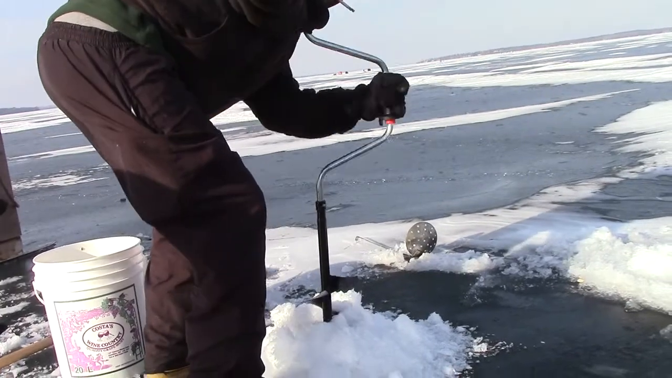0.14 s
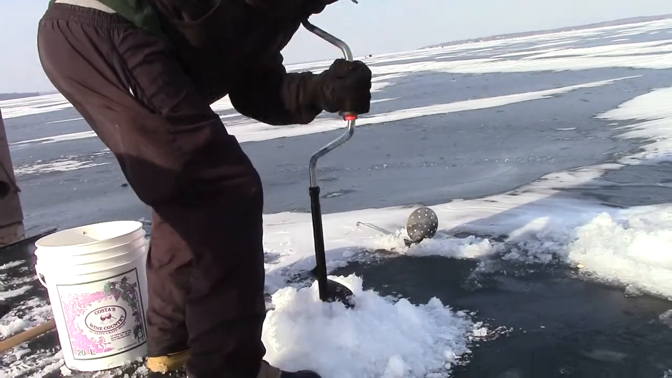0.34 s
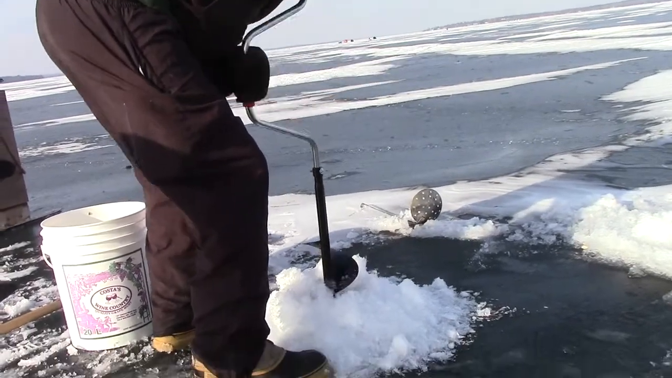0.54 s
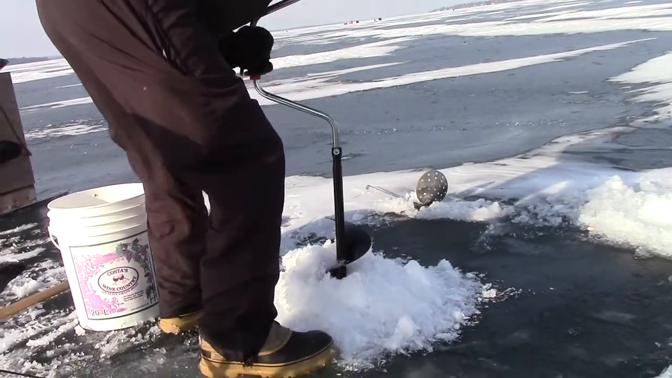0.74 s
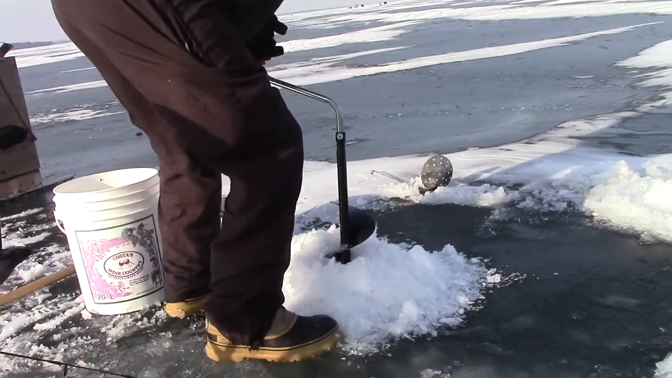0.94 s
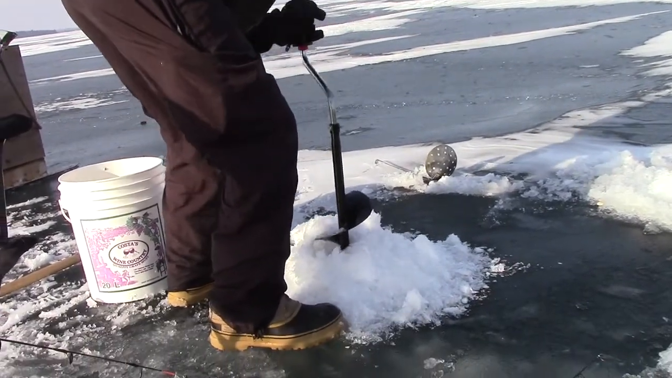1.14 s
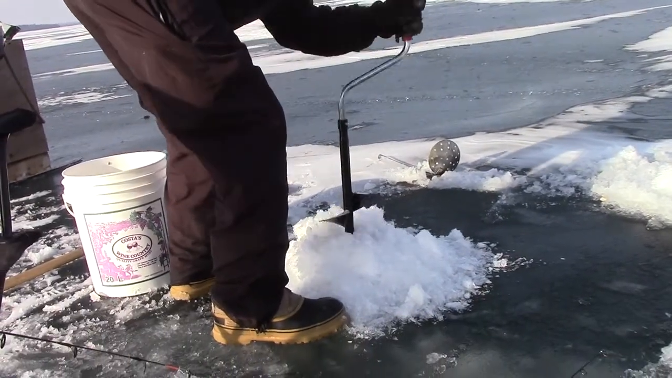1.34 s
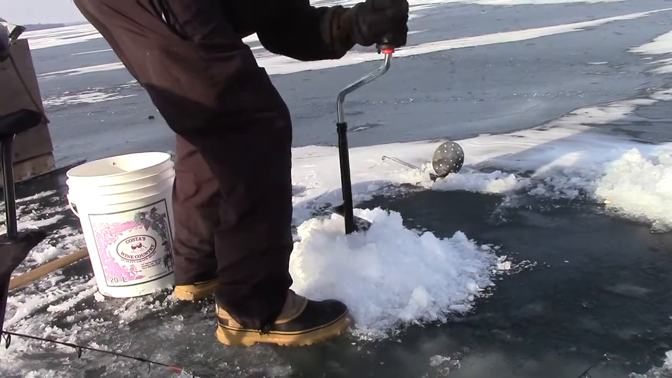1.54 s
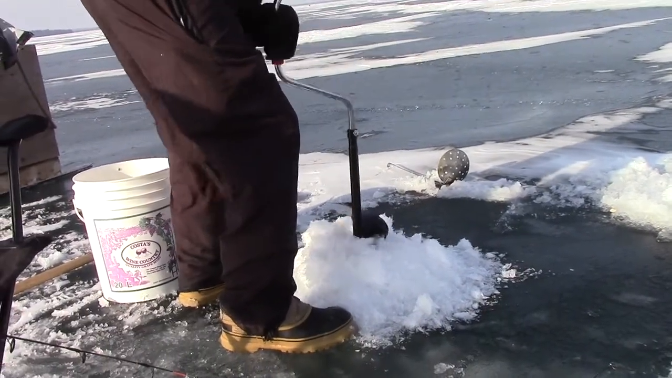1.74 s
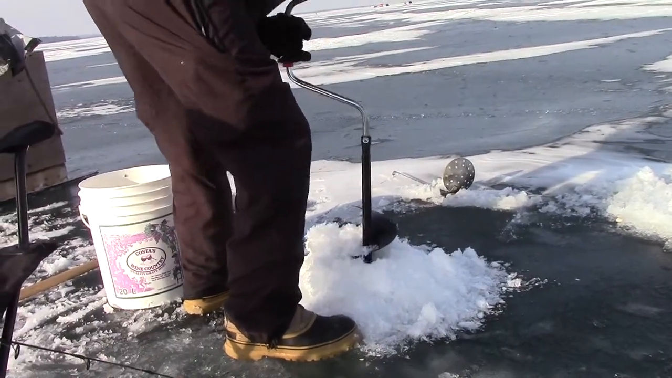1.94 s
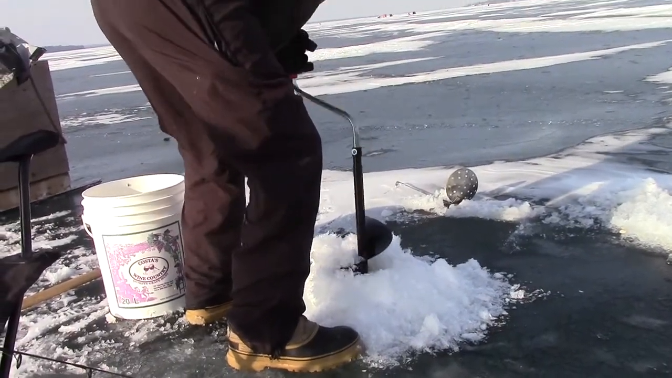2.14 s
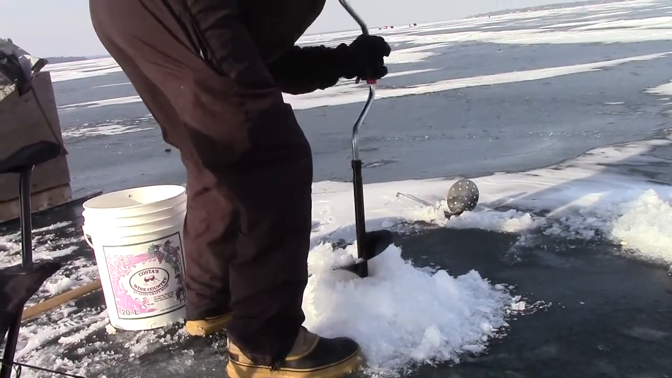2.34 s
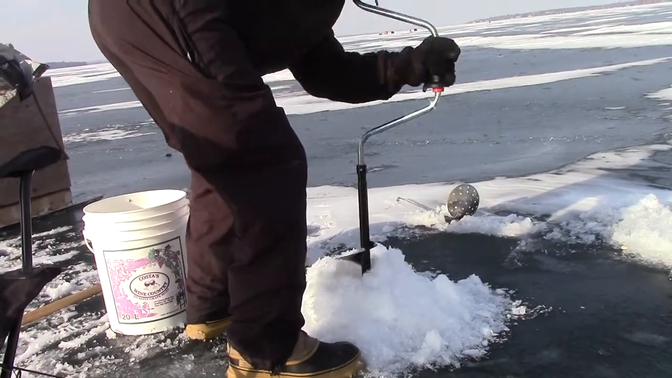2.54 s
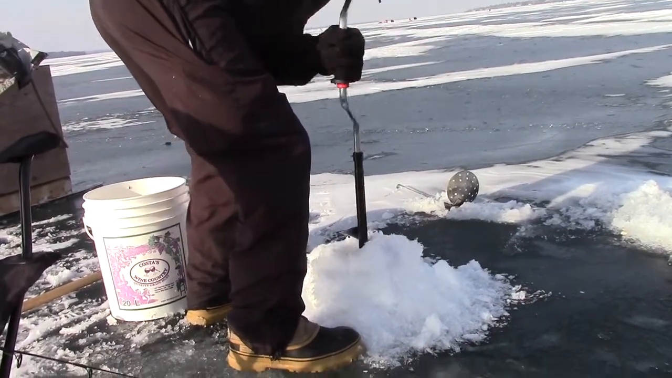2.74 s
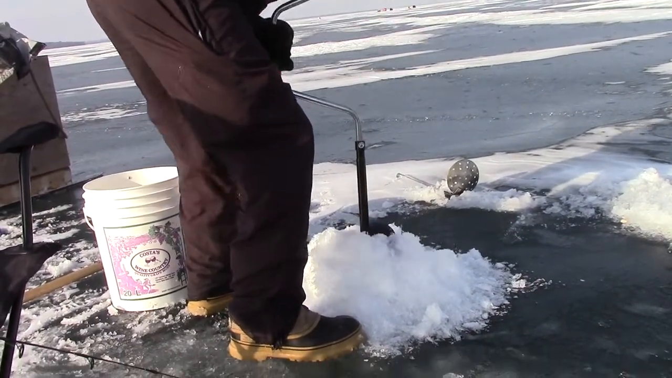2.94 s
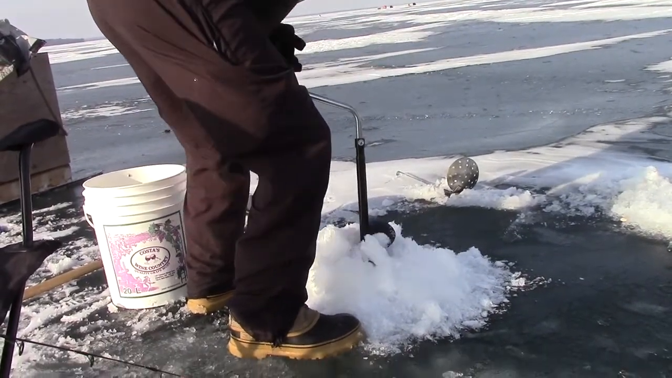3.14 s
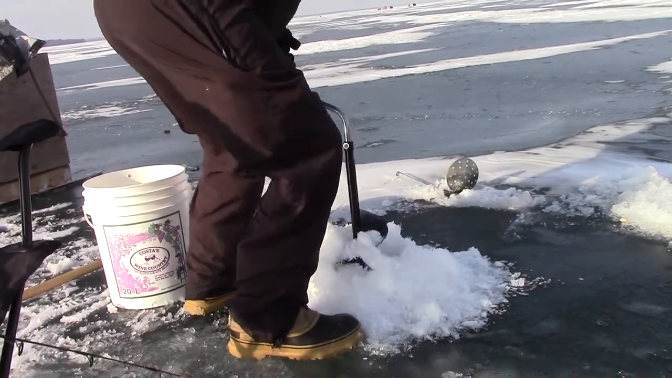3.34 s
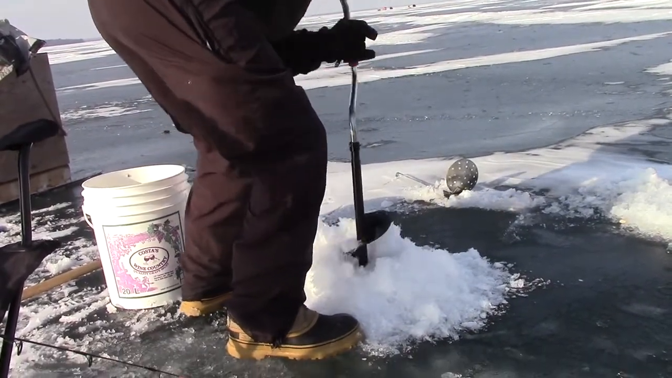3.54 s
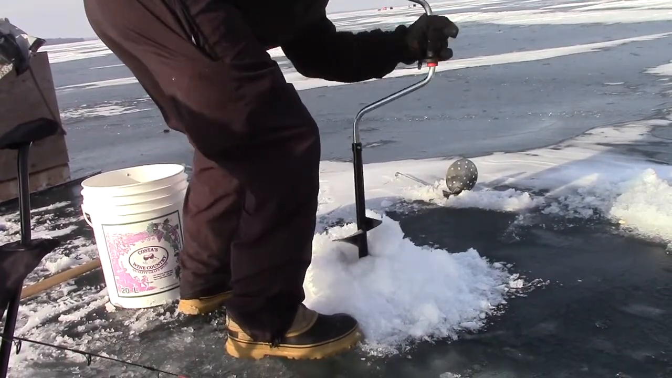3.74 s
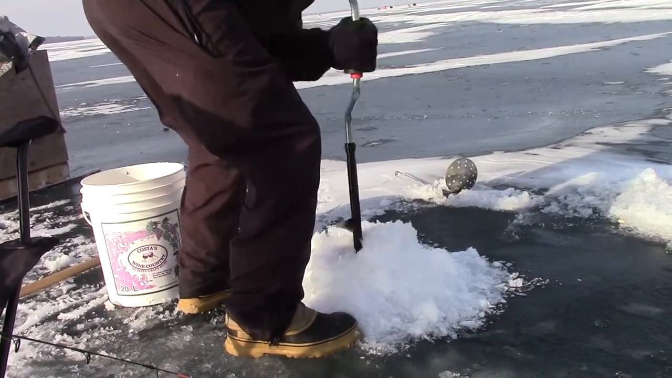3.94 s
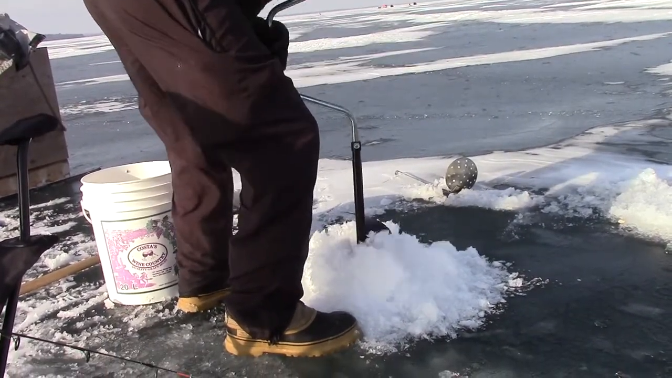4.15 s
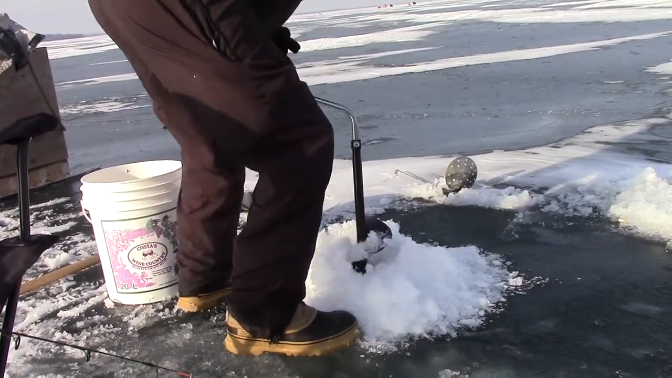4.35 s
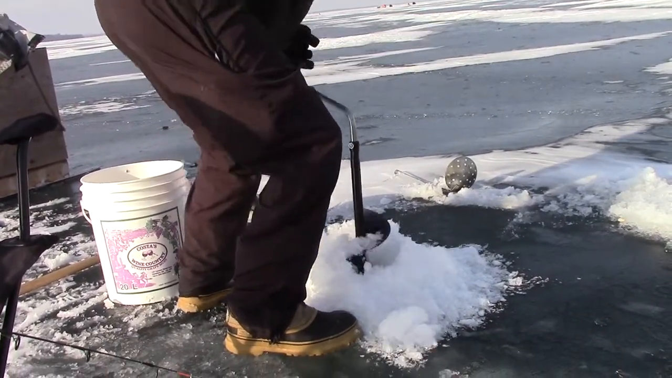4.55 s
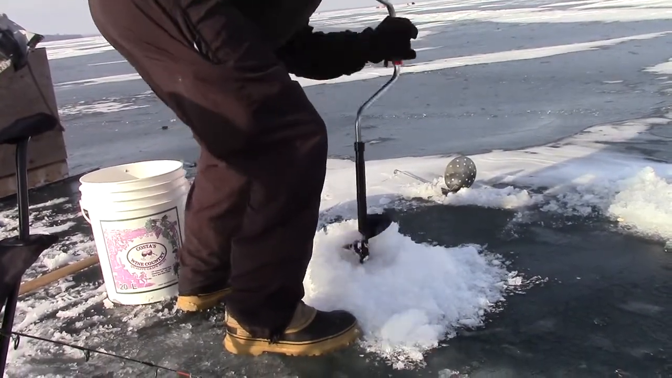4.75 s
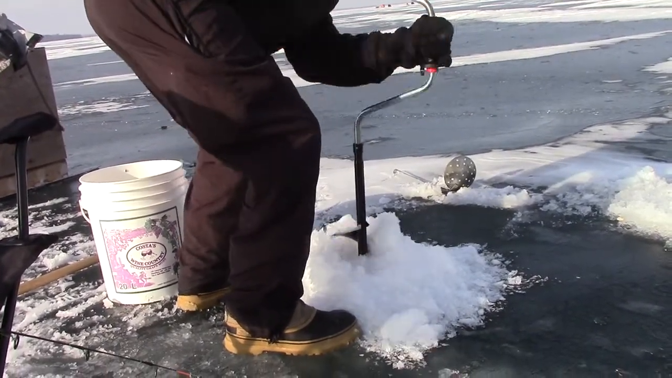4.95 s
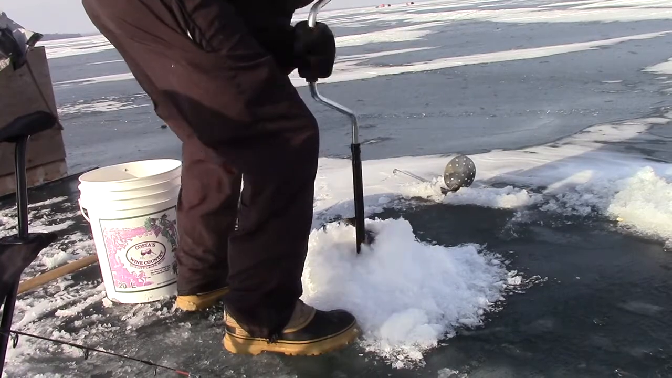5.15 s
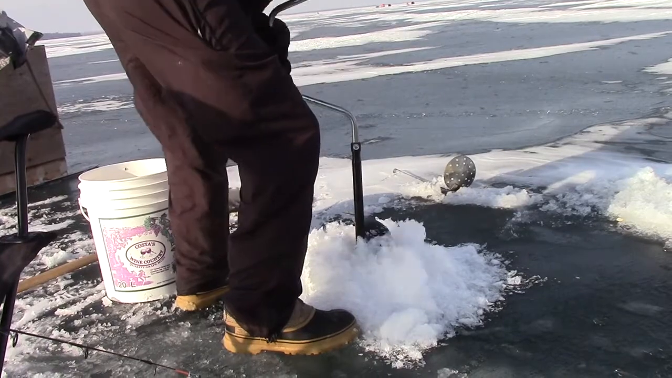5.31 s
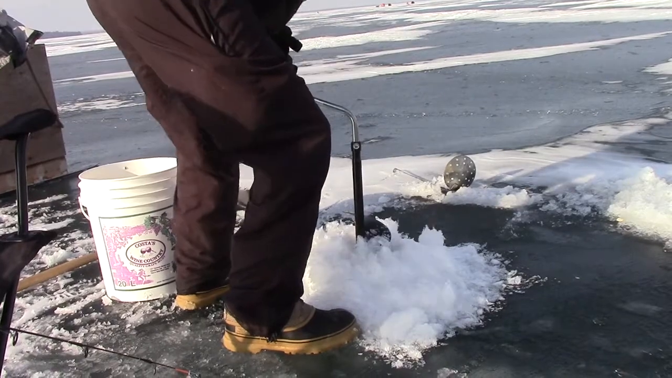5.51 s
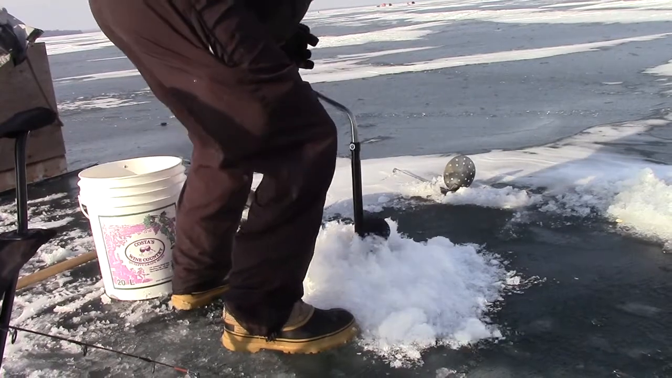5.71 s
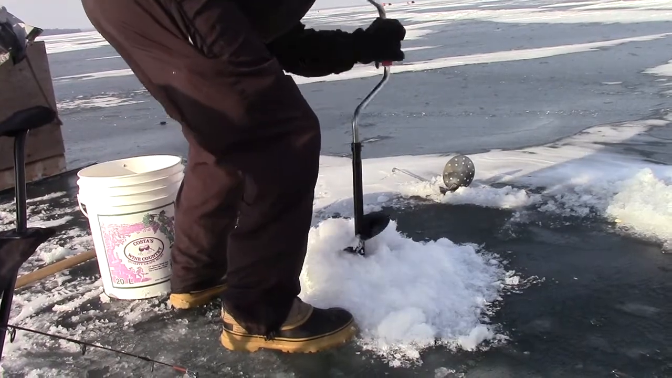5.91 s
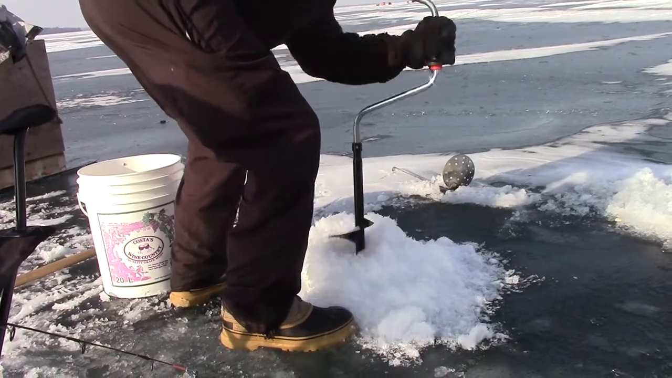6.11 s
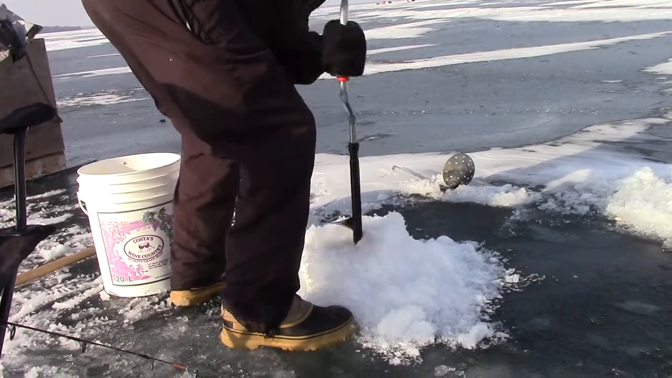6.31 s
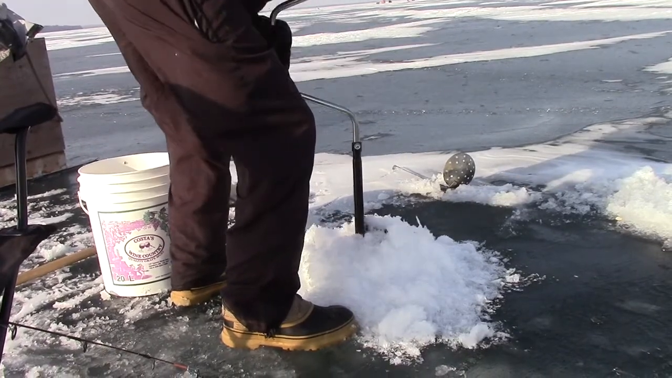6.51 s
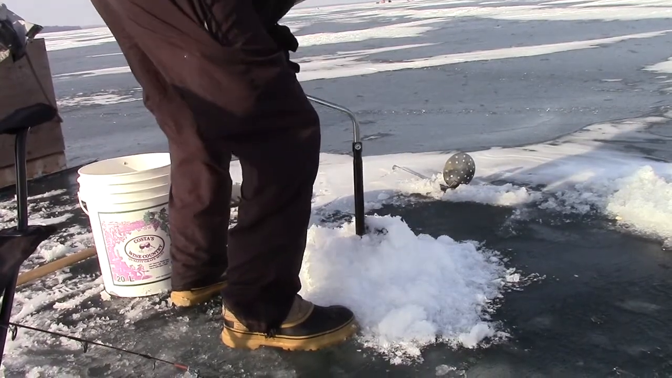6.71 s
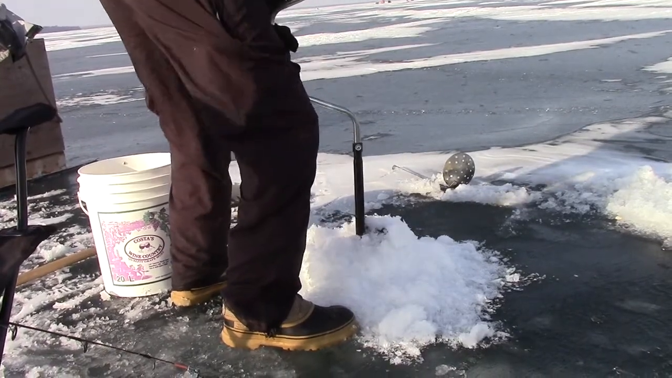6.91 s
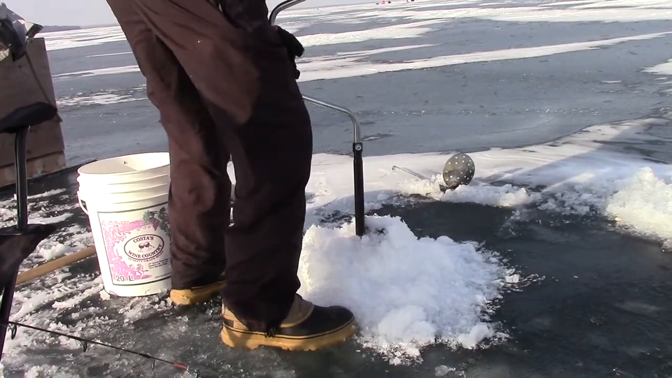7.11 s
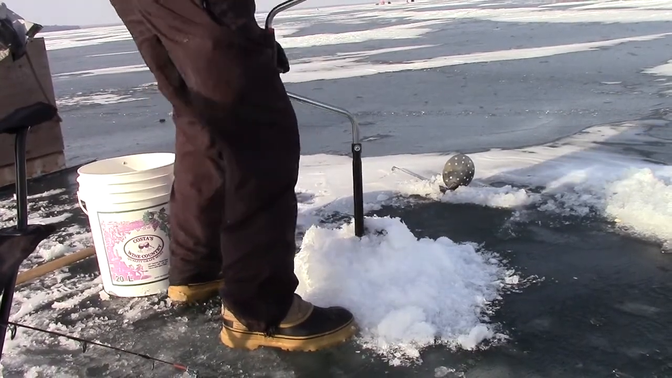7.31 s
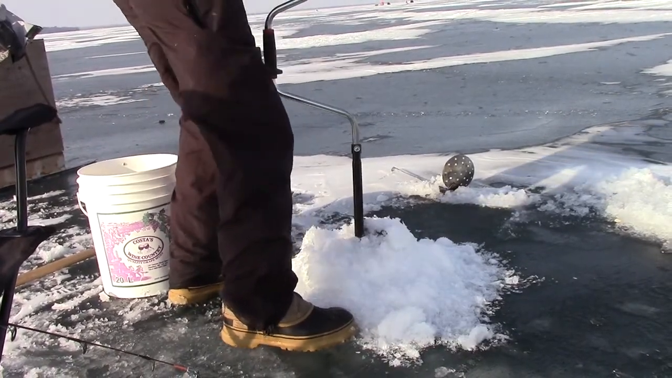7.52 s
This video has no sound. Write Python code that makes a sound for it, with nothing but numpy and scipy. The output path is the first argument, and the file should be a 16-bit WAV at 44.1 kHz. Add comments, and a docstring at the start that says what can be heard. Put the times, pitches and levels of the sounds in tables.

```python
"""A hand auger bores through lake ice in the open air: six turns of the crank, with pauses to change grip.
The blades break the ice in countless tiny random cracks, which ring the hole and the steel spiral through
resonances that shift as it turns. Chips snap off in short bursts of cracks, and the blade clanks in dying tones.
Shavings trickle as random clicks; boots, sleeves and open air are coloured noise.
Knocks are short scuffs in one resonance each, and near the end the crank squeaks in thin, wavering tones."""
import sys
import numpy as np
from scipy import signal
from scipy.fft import rfft, irfft, next_fast_len
from scipy.io import wavfile
from scipy.ndimage import uniform_filter1d

SR = 44100
rng = np.random.default_rng(int(sys.argv[2]) if len(sys.argv) > 2 else 0)


def unload_audio(sound):
    """Save the sound as a 16-bit wav file, at the path given as the first command line argument."""
    columns = np.transpose(np.atleast_2d(sound))
    # keep every value between -1 and 1, then stretch to whole-number steps
    steps = np.round(np.clip(columns, -1, 1) * 32767)
    wavfile.write(sys.argv[1], SR, steps.astype(np.int16))


N = 333837
TIME = np.arange(N) / SR   # seconds

# The turns of the crank; the first is already under way when the sound begins.
# Each row: start in seconds, end in seconds, force in dB, time to bite in in seconds, change in level at the
# stop in dB, trickling shavings in dB (before they settle), shuffling boots in dB (before they settle).
CRANK_TURNS = [(-.33, 0.715, 0.84, .02, -17.5, -53.5, -71), (0.948, 1.9, 0.7, 0.026, -31, -48, -53.5),
               (2.065, 2.985, 0.47, 0.038, -21, -43, -62), (3.25, 4.192, 0.56, 0.0094, -18.5, -41.5, -44.5),
               (4.41, 5.347, 0.1, 0.0086, -16.5, -45, -49.5), (5.579, 6.537, -1, 0.011, -18.5, -48, -48.5)]
# How every turn presses the blades, before force, bite-in, stop and ice are added.
# Each row: place in the turn from 0 to 1, cutting in dB, deep grinding in dB next to the cutting,
# fine hiss in dB next to the cutting.
STROKE_PRESSURE = [(0, -30.5, -1, -7), (.07, -25.5, -4.5, -2), (.18, -27.5, -1, -2.5), (.28, -24, -3, 2.5),
                   (.35, -24, -3.5, 1.2), (.47, -23.5, -4, -0.7), (.56, -22.5, -3.8, -1),
                   (.71, -21.5, -5.5, -4), (.88, -21, -6.5, -2), (1, -23, -3, -1.5)]
BITE_IN_DB = -9.5   # the blades start this much softer
STOP_S, STOP_BITE_DB = 0.075, 8.5   # the crank slows over this time, and the grinding turns deeper
# Patches of harder or softer ice.
# Each row: middle in seconds, change in the ring of the steel in dB, half length in seconds.
ICE_PATCHES = [(0.008, 4.5, .04), (.21, -3, 0.023), (0.323, 8, 0.032), (0.623, 1.5, 0.046),
               (1.07, -4, 0.032), (1.197, 2, 0.051), (2.93, -4, 0.04), (3.3, 4.5, 0.044), (3.44, -6, 0.12),
               (3.803, -3.5, 0.031), (4.437, -0.5, 0.02), (5.026, 3, 0.029), (5.625, -8, .025)]
PATCH_DEEP_SHARE, PATCH_HISS_SHARE = 0.27, 0.23   # how much of that change the other registers get
# As the hole deepens, each register changes steadily; the change is zero at HALFWAY_S seconds.
DEEP_DB_PER_S, MIDDLE_DB_PER_S, HISS_DB_PER_S = 1.64, 0.94, -0.08
HALFWAY_S = 3.3
MIDDLE_DB, MIDDLE_FOLLOWS = -6, 0.48   # 750-1400 Hz next to the cutting; share of the deep grinding it follows
# The hole booms more as it deepens: lift below 350 Hz, in dB at the start and in dB at the end.
HOLE_BOOM_DB = (-9.5, 1)

# Broad colour of a crack. Each row: frequency in Hz, level in dB.
CRACK_COLOUR = [(30, -48), (70, -48), (150, -12.5), (240, -4.5), (370, -14), (520, -2), (800, 0),
                (1350, -4.5), (2400, -3), (3900, -5.5), (4400, -12.5), (8700, -10), (12000, -22.5),
                (16000, -31.5)]
# Steady resonances of hole and auger. Each row: frequency in Hz, width in Hz, lift in dB.
STEADY_RINGS = [(165, 50, 3), (247, 40, 2.5), (535, 50, 4), (580, 42, 8), (1560, 55, 4), (1860, 100, 2.5),
                (2090, 110, 2.5), (2640, 130, 4.5), (3270, 120, 2), (3600, 250, 2), (4050, 120, 3),
                (5180, 130, 5), (6080, 300, 3), (7500, 200, 2.5), (8260, 200, 1.5), (8855, 50, 3),
                (9170, 160, 5), (10200, 250, 2.5)]
# Resonances that change most as the spiral faces a certain way.
# Each row: frequency in Hz, width in Hz, lift in dB, place in the turn from 0 to 1, spread in turns.
TURNING_RINGS = [(975, 210, 8.5, 0.11, 0.18), (910, 450, 7.5, 0.9, .1), (1154, 74, 12, 0.58, 0.19),
                 (1130, 260, -3.5, 0.4, 0.069), (2064, 115, 11, 0.33, 0.16), (3510, 86, 9, 0.4, 0.14),
                 (1800, 51, 5.5, 0.82, 0.36), (2630, 140, 5.5, 0.14, 0.18), (1580, 74, 11, 1, 0.05),
                 (2116, 230, 7.5, 0.99, 0.15)]

# Colour of the trickling shavings. Each row: frequency in Hz, level in dB.
TRICKLE_COLOUR = [(290, -57), (500, -31), (586, -8), (1020, -25.5), (1190, -14), (1620, -10), (2610, -8),
                  (10500, 1), (16000, -12.5)]
TRICKLE_HOLD_S = 0.17   # the shavings keep sliding for this long after a turn
TRICKLE_DB_PER_S, SHUFFLE_DB_PER_S = -42, -4   # shavings and boots settle once the crank stops
# Colour of the shuffling boots. Each row: frequency in Hz, level in dB.
BOOT_COLOUR = [(15, -51.5), (25, -40), (102, 0.5), (168, 2.5), (284, -2), (325, -7), (395, -8), (775, -15),
               (900, -30), (1170, -51), (1980, -120)]
# Colour of the open air. Each row: frequency in Hz, level in dB.
AIR_COLOUR = [(15, -18), (25, -29.5), (87, -26.5), (166, -13), (354, -10), (714, -11), (911, -9),
              (9070, -17.5), (14800, -22), (16000, -43.5)]
AIR_DB = -56.5

# The blade catches and a chip breaks off. Each row: start in seconds, level in dB of the burst before the
# auger colours it, thud (everything below 1400 Hz) in dB, snap (above 4400 Hz) in dB.
ICE_CHIPS = [(0.176, -5.5, 7, 5), (.952, -8, 6, 12), (1.080, -6.5, 3, 4), (1.095, -5, -6, 2),
             (2.043, -24, 9.5, 13.5), (2.07, -19.5, -12, 10), (2.933, -2.5, -3, -1), (2.964, -6, 0.5, -4),
             (3.244, -17.5, -3, 1), (3.265, -16, 9, -12), (3.375, -12, 10, -8), (3.843, -11, 12.5, 20.5),
             (4.421, -14.5, 15, 17), (4.923, -8, 3, 13.5), (5.066, -0.5, 7, -2), (5.587, -8, 7, 4),
             (5.630, -10, 10, -2), (6.535, -16.5, 4, -2)]
CHIP_DECAY_S = 0.003
# The blade lands hard and the steel clanks. Each row: start in seconds, level in dB.
BLADE_CLANKS = [(.952, -7.5), (5.593, -13.5)]
# Tones of the struck blade. Each row: frequency in Hz, level in dB, time to fall by 60 dB in seconds.
BLADE_MODES = [(2590, 0, 0.01), (6870, 0.5, 0.013), (9200, -22, .025)]
# Light knocks of the loose crank, boots and falling crumbs.
# Each row: start in seconds, peak in dB, pitch in Hz.
LIGHT_KNOCKS = [(2.025, -26, 1000), (3.04, -34.5, 874), (3.122, -41, 2200), (3.217, -26.5, 2100),
                (4.251, -29, 229), (4.282, -35, 910), (4.308, -32.5, 287), (4.366, -25, 2290),
                (5.416, -23, 1990), (5.434, -30.5, 178), (5.526, -31, 2400), (6.571, -25, 2060),
                (6.619, -35, 765), (6.678, -27.5, 1250), (6.697, -30, 10600), (6.766, -27.5, 11300),
                (7.02, -34.5, 9000), (7.122, -37, 695), (7.151, -32.5, 1110), (7.276, -34.5, 1580)]
# Brief squeaks of the crank, before they waver and tremble.
# Each row: middle in seconds, pitch in Hz, level in dB, fading time on either side in seconds.
CRANK_SQUEAKS = [(6.704, 1750, -46, 0.012), (7.101, 935, -44, 0.0064), (7.315, 2353, -31.5, 0.0092)]
# Sleeves brush against the jacket. Each row: middle in seconds, level in dB, half length in seconds.
SLEEVE_BRUSHES = [(7.286, -51, 0.049), (7.53, -52, 0.027)]
# Colour of the cloth. Each row: frequency in Hz, level in dB.
CLOTH_COLOUR = [(100, -24), (700, 8), (1800, -4), (3000, 1), (4200, -11), (6000, -4.5), (16000, -30)]

# Sound glancing off the growing heap of shavings differs between the ears: dB at the start, dB at the end.
HEAP_SCATTER_DB = (-63, -6.5)
SCATTER_HZ, SCATTER_WIDTH_HZ, SCATTER_LAG_S = 1280, 1330, .0012
CUTOFF_HZ = 16000


def from_db(db):
    """Turn decibels into a gain."""
    return 10 ** (np.asarray(db) / 20)


def rms_one(x):
    """Scale a sound so that its average strength (rms) is 1."""
    return x / np.sqrt(np.mean(x ** 2) + 1e-20)


def in_time(rows):
    """Draw straight lines between rows of (seconds, values) and read each value at every sample."""
    s, *columns = np.transpose(rows)
    return [np.interp(TIME, s, column) for column in columns]


def drift(rate_hz):
    """Smooth random wandering with a spread of 1: noise slowed by a filter, computed at every 20th sample."""
    r = np.exp(-40 * np.pi * rate_hz / SR)
    noise = rng.standard_normal(N // 20 + 2002)
    slow = signal.lfilter([1], [1, -2 * r, r * r], noise)[2000:]   # skip the filter's start
    return np.interp(np.arange(N) / 20, np.arange(len(slow)), rms_one(slow))


def colour(x, points):
    """Filter a sound to follow (Hz, dB) points, with no sound ahead of its cause (minimum phase)."""
    size = 2 * next_fast_len(N // 2 + SR // 10)
    hz, db = np.transpose(points)
    grid_hz = np.maximum(np.arange(size // 2 + 1) * SR / size, 1)
    gain = from_db(np.interp(np.log(grid_hz), np.log(hz), db))
    # folding the cepstrum onto its first half gives the minimum phase
    cepstrum = irfft(np.log(gain))
    cepstrum[1:size // 2] *= 2
    cepstrum[size // 2 + 1:] = 0
    response = np.exp(rfft(cepstrum))
    return irfft(rfft(x, size) * response)[:N]


def resonance(x, hz, width_hz):
    """A two-pole resonance lets one frequency ring, with a gain of 1 at its top."""
    r = np.exp(-np.pi * width_hz / SR)
    top = np.array([1, 0, -1]) * (1 - r * r) / 2
    bottom = [1, -2 * r * np.cos(2 * np.pi * hz / SR), r * r]
    return signal.lfilter(top, bottom, x + 1e-18)


def lift(x, hz, width_hz, lift_db):
    """Raise or lower a sound around one frequency by adding or removing its resonance."""
    return x + (from_db(lift_db) - 1) * resonance(x, hz, width_hz)


def split(x, hz):
    """Crossover: the parts of a sound below and above a frequency."""
    sections = [signal.butter(2, hz, kind, fs=SR, output="sos") for kind in ("low", "high")]
    return [signal.sosfilt(np.vstack([s, s]), x) for s in sections]


def registers(x):
    """Split into deep grinding, middle, ring of the steel and fine hiss, kept in phase with each other."""
    low, high = split(x, 1400)
    # each half also passes the other half's crossover, so both are delayed alike
    deep, middle = split(sum(split(low, 4400)), 750)
    steel, hiss = split(sum(split(high, 750)), 4400)
    return deep, middle, steel, hiss


def grains(per_s, spread_db):
    """Random clicks, as from breaking or tumbling grains: many small ones, a few large."""
    sizes = from_db(spread_db * np.minimum(rng.exponential(1, N), 5))
    signs = rng.choice([-1, 1], N)
    happens = rng.random(N) < per_s / SR
    return rms_one(sizes * signs * happens)


def place_at(out, s, sound):
    """Add a short sound to a longer one, starting at a time in seconds."""
    at = round(s * SR)
    out[at:at + len(sound)] += sound


def this_turn():
    """At every sample: the place in the turn (0-1), then the columns of the latest turn."""
    rows = np.array(CRANK_TURNS)
    latest = np.searchsorted(rows[1:, 0] - .01, TIME)   # switch 10 ms ahead, so the blades can fade in
    start, end, *rest = rows[latest].T
    return np.clip((TIME - start) / (end - start), 0, 1), start, end, *rest


def pressure():
    """Blades bite in, follow the stroke and slow to a stop: when they move (0-1), and dB of four registers."""
    place, start, end, force_db, bite_in_s, stop_db, _, _ = this_turn()
    places, *columns = np.transpose(STROKE_PRESSURE)
    cut_db, bite_db, shave_db = [np.interp(place, places, column) for column in columns]

    moving = np.clip(np.minimum(TIME - start, end - TIME) / 0.007 + 1, 0, 1)   # 7 ms fades
    biting_in = np.exp(-np.maximum(TIME - start, 0) / bite_in_s)
    stopping = np.clip(1 - (end - TIME) / STOP_S, 0, 1) ** 2
    cut_db = cut_db + force_db + BITE_IN_DB * biting_in + stop_db * stopping
    bite_db = bite_db + STOP_BITE_DB * stopping

    hard_db = sum(db * np.exp(-((TIME - s) / length_s) ** 2) for s, db, length_s in ICE_PATCHES)
    hard_deep_db = PATCH_DEEP_SHARE * hard_db
    deepening_s = TIME - HALFWAY_S
    deep_db = bite_db + DEEP_DB_PER_S * deepening_s + hard_deep_db
    middle_db = MIDDLE_DB + MIDDLE_FOLLOWS * bite_db + MIDDLE_DB_PER_S * deepening_s + hard_deep_db
    steel_db = hard_db - 2.75
    hiss_db = shave_db - .66 + HISS_DB_PER_S * deepening_s + PATCH_HISS_SHARE * hard_db
    return moving, cut_db + np.array([deep_db, middle_db, steel_db, hiss_db])


def slips(per_s, jitter, decay_s, spread_db):
    """The blade sticks and slips unevenly; each slip is a flurry of cracks that dies away. Mean about 1."""
    timing, size = rng.standard_normal((4000, 2)).T
    at = (np.cumsum(np.exp(jitter * timing)) / per_s * SR).astype(int)
    inside = at < N
    kicks = np.zeros(N)
    kicks[at[inside]] = from_db(spread_db * np.clip(size[inside], -2, 2))
    flurry = signal.lfilter([1], [1, -np.exp(-1 / (decay_s * SR))], kicks)
    # the crank feeds the blade steadily, so flurries are evened out against the 40 ms around them
    return flurry / (uniform_filter1d(flurry, size=SR // 25) + 1e-3)


def sticking(depth_db, length_s):
    """The blade stalls for an instant just before a chip gives way."""
    times = np.array(ICE_CHIPS)[:, 0]
    upcoming = np.minimum(np.searchsorted(times, TIME), len(times) - 1)
    wait_s = times[upcoming] - TIME
    stalled = ((wait_s > 0) & (wait_s < length_s)).astype(float)
    return from_db(depth_db * uniform_filter1d(stalled, size=SR // 300))   # soften the edges


def auger(cracks):
    """Cracks ring the hole and the steel; some resonances come and go with the angle of the spiral."""
    angle = this_turn()[0]
    x = colour(cracks, CRACK_COLOUR)
    for hz, width_hz, lift_db in STEADY_RINGS:
        x = lift(x, hz, width_hz, lift_db)
    for hz, width_hz, lift_db, place, spread in TURNING_RINGS:
        facing = np.exp(-((angle - place) / spread) ** 2)
        x = lift(x, hz, width_hz, lift_db * facing)
    return x


def glints(x, count, width_hz, swell_db, rate_hz):
    """The spiral has many narrow modes; each rises and sinks as packed shavings slide along the steel."""
    for hz in np.linspace(1400, 13000, count) * from_db(.15 * rng.standard_normal(count)):
        lift_db = swell_db * np.clip(drift(rate_hz), -2, 1.7)
        x = lift(x, hz, width_hz * np.sqrt(hz / 2000), lift_db)   # higher modes are wider
    return x


def grinding():
    """Steady shaving plus stick-slip flurries, played by the pressure on the blades."""
    moving, levels_db = pressure()
    flurry = slips(per_s=170, jitter=.6, decay_s=0.0033, spread_db=4.0)
    cracks = grains(per_s=9000, spread_db=1.0) * (1 + 0.32 * flurry)
    glinting = glints(auger(cracks), count=50, width_hz=75, swell_db=3.8, rate_hz=7)
    boom, rest = split(glinting, 350)
    ringing = rest + boom * from_db(np.linspace(*HOLE_BOOM_DB, N))
    sound = 0
    for level_db, part in zip(levels_db, registers(ringing)):
        # even out each register first, then give it its own level
        sound = sound + from_db(level_db) * part / part[moving > .5].std()
    uneven_ice = from_db(0.36 * drift(27))
    return moving * sticking(depth_db=-8.5, length_s=0.0029) * uneven_ice * sound


def shavings():
    """Loose shavings trickle as tumbling grains, and settle soon after each turn stops."""
    _, _, end, _, _, _, trickle_db, _ = this_turn()
    settling_s = np.maximum(np.maximum(TIME - end, 0) - TRICKLE_HOLD_S, 0)
    level_db = trickle_db + TRICKLE_DB_PER_S * settling_s
    return from_db(level_db) * rms_one(colour(grains(per_s=8000, spread_db=2.5), TRICKLE_COLOUR))


def boots():
    """The driller shifts his weight: unevenly rubbing noise, mostly low, that fades as the boots settle."""
    end = this_turn()[2]
    # each level is reached 0.15 s after its turn ends
    shuffle_db, = in_time([(turn[1] + .15, turn[-1]) for turn in CRANK_TURNS])
    level_db = shuffle_db + SHUFFLE_DB_PER_S * np.maximum(TIME - end, 0)
    rubbing = rng.standard_normal(N) * from_db(1.05 * drift(52))
    return from_db(level_db) * rms_one(colour(rubbing, BOOT_COLOUR))


def open_air(level_db):
    """The air over the lake hisses faintly as steady coloured noise."""
    return from_db(level_db) * rms_one(colour(rng.standard_normal(N), AIR_COLOUR))


def chips():
    """A chip breaks off in a short burst of cracks through the same auger."""
    bursts, age = np.zeros(N), TIME[:SR // 20]
    for s, level_db, _, _ in ICE_CHIPS:
        place_at(bursts, s, from_db(level_db) * np.exp(-age / CHIP_DECAY_S))
    deep, middle, steel, hiss = registers(auger(bursts * rng.choice([-1, 1], N)))
    # hold each chip's thud and snap for 4 ms, then glide to the next chip's
    held = [(s + after, thud, snap) for s, _, thud, snap in ICE_CHIPS for after in (0, .004)]
    thud_db, snap_db = in_time(held)
    return steel + from_db(thud_db) * (deep + middle) + from_db(snap_db) * hiss


def clanks():
    """The struck blade rings briefly, damped by the ice, and its clank carries no bass."""
    out, age = np.zeros(N), TIME[:SR // 20]
    ring = sum(from_db(db - 60 * age / t60) * np.sin(2 * np.pi * hz * age) for hz, db, t60 in BLADE_MODES)
    for s, level_db in BLADE_CLANKS:
        place_at(out, s, from_db(level_db) * ring)
    _, without_bass = split(out, 920)
    return without_bass


def knocks(decay_s, width_share):
    """Short scuffs of contact, each in one broad resonance with steep skirts."""
    out, age = np.zeros(N), TIME[:SR // 20]
    for s, peak_db, hz in LIGHT_KNOCKS:
        contact = rng.choice([-1, 1], len(age)) * np.exp(-age / decay_s)
        width_hz = hz * width_share
        knock = resonance(resonance(contact, hz, width_hz), hz, width_hz)   # twice for steep skirts
        place_at(out, s, from_db(peak_db) * knock / np.abs(knock).max())
    return out


def squeaks():
    """The grip slips on the crank with a thin, wavering tone and a faint octave above it."""
    out = 0
    wavering_time = np.cumsum(1 + 0.0084 * drift(120)) / SR
    tremble = from_db(3.3 * drift(150))
    for s, hz, level_db, length_s in CRANK_SQUEAKS:
        phase = 2 * np.pi * hz * wavering_time
        swell = np.exp(-np.minimum(np.abs(TIME - s) / length_s, 20))
        tone = np.sin(phase) + from_db(-24) * np.sin(2 * phase)
        out = out + from_db(level_db) * swell * tone
    return out * tremble


def sleeves():
    """Cloth brushes on cloth: coloured noise that swells and fades smoothly."""
    brushing = sum(from_db(db) / (1 + ((TIME - s) / length_s) ** 4) for s, db, length_s in SLEEVE_BRUSHES)
    return brushing * rms_one(colour(rng.standard_normal(N), CLOTH_COLOUR))


def scene():
    """Everything lies almost straight ahead, with no walls to echo; the two ears differ by a trace."""
    mid = grinding() + shavings() + boots() + open_air(AIR_DB) + chips() + clanks()
    mid = mid + knocks(decay_s=0.0027, width_share=0.83) + squeaks() + sleeves()
    glancing = resonance(resonance(mid, SCATTER_HZ, SCATTER_WIDTH_HZ), SCATTER_HZ, SCATTER_WIDTH_HZ)
    late = np.interp(TIME - SCATTER_LAG_S, TIME, glancing, left=0)
    scatter = from_db(np.linspace(*HEAP_SCATTER_DB, N)) * late
    side = scatter + open_air(-76)
    return np.array([mid + side, mid - side])


def record(dry):
    """The very highest peaks are rounded and everything above the cutoff is removed."""
    rounded = dry / (1 + (dry / .92) ** 6) ** (1 / 6)
    return signal.sosfilt(signal.ellip(12, .1, 80, CUTOFF_HZ, fs=SR, output="sos"), rounded)


dry = scene()
out = record(dry)
unload_audio(out)
```